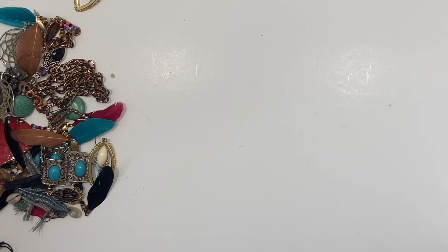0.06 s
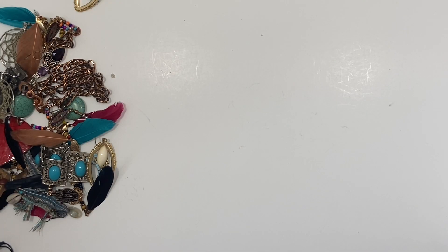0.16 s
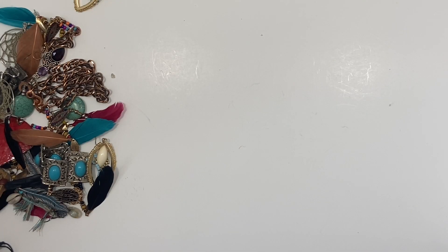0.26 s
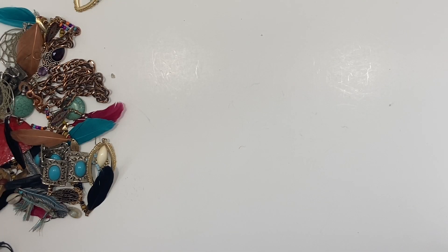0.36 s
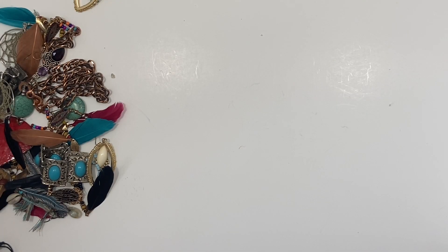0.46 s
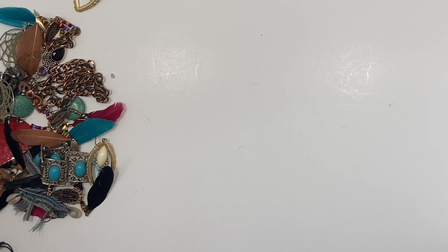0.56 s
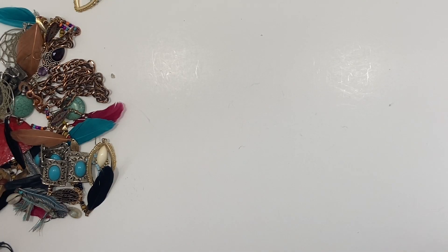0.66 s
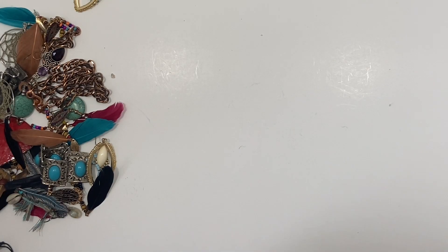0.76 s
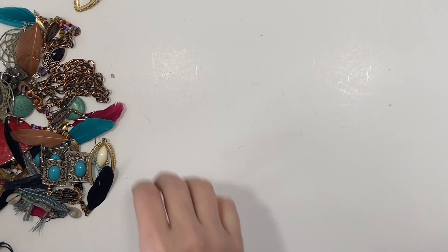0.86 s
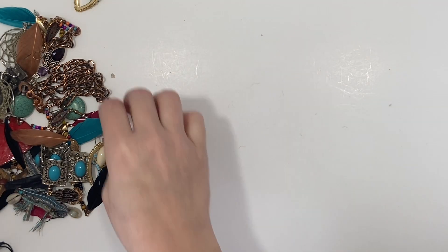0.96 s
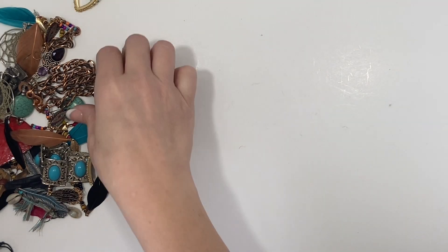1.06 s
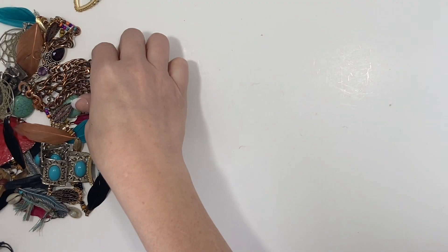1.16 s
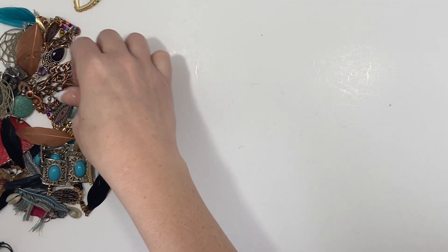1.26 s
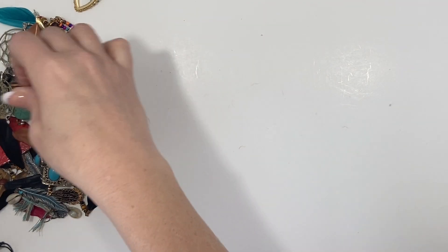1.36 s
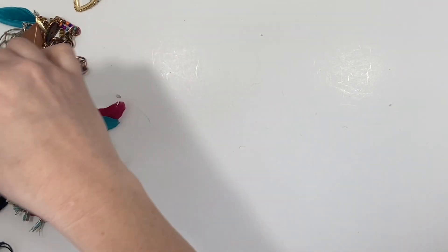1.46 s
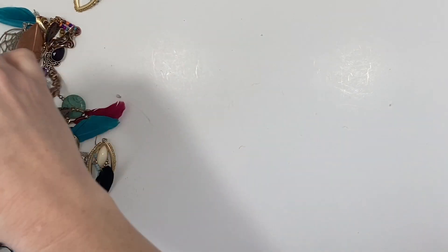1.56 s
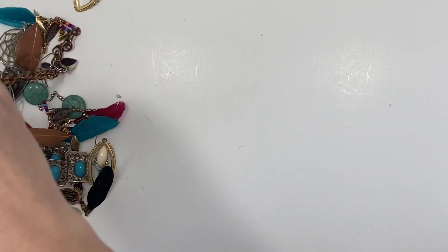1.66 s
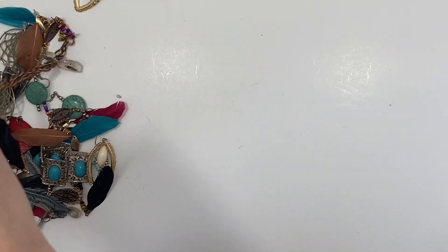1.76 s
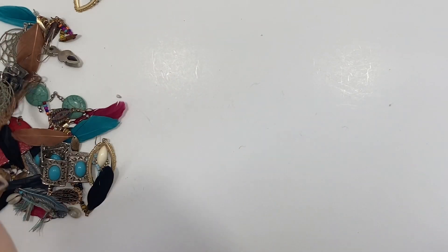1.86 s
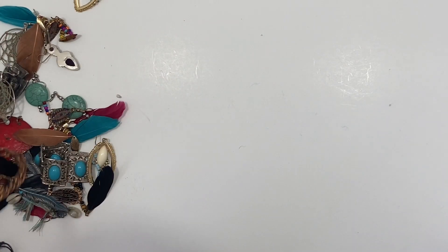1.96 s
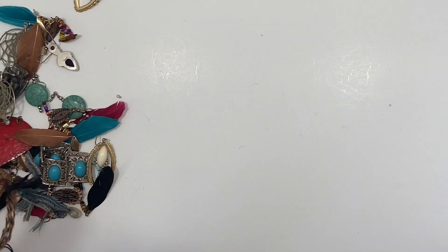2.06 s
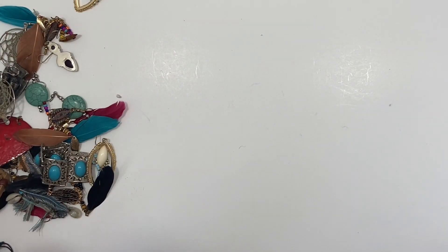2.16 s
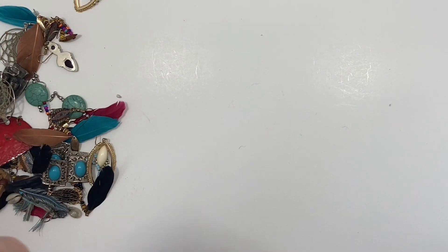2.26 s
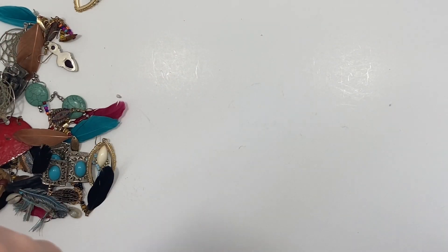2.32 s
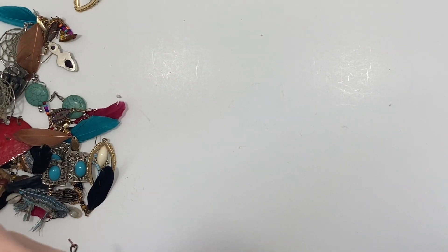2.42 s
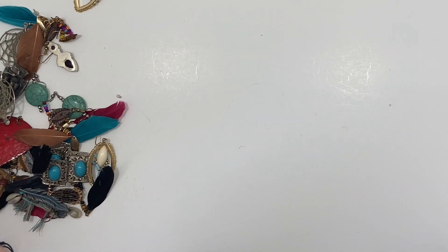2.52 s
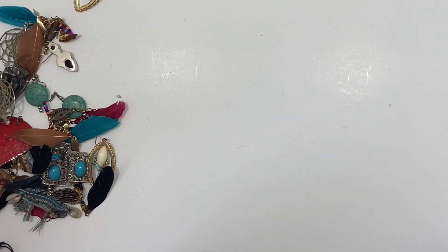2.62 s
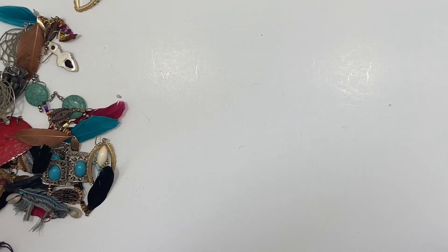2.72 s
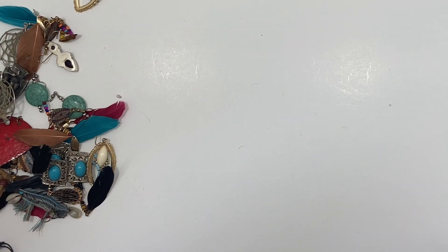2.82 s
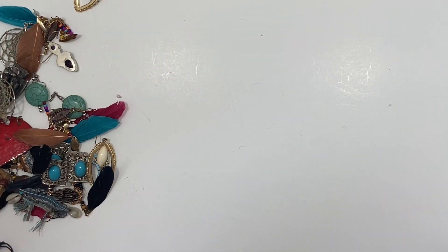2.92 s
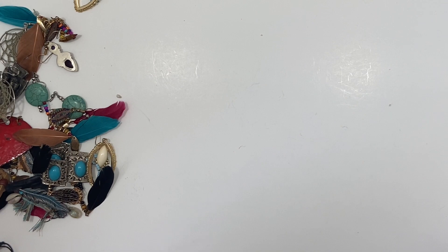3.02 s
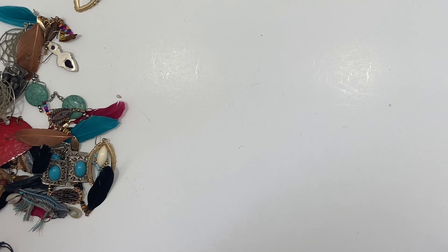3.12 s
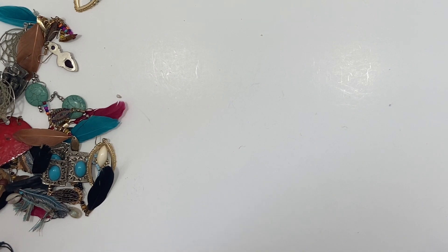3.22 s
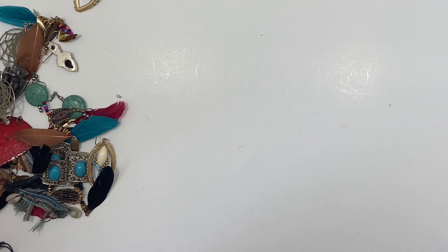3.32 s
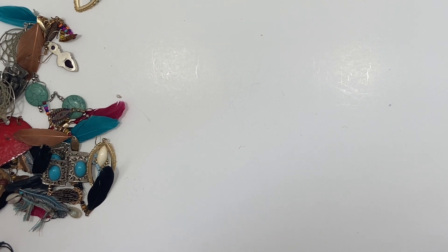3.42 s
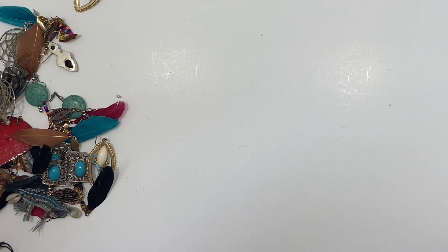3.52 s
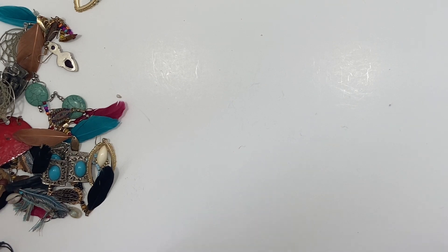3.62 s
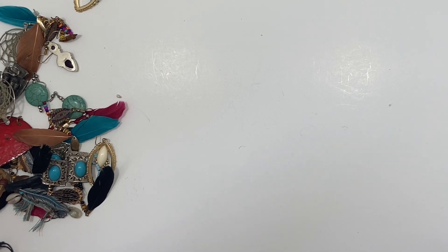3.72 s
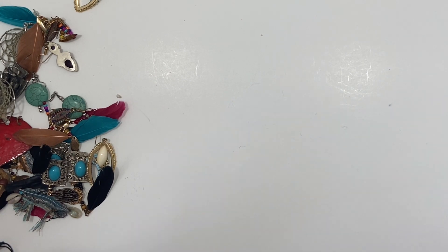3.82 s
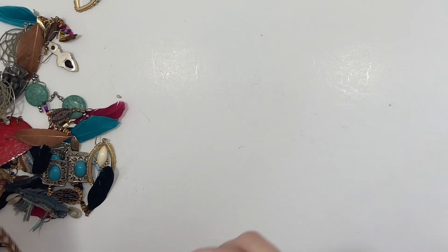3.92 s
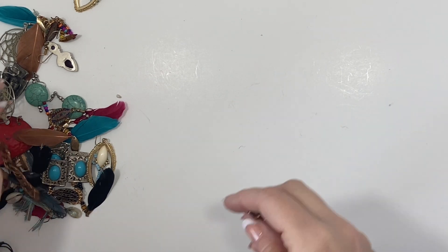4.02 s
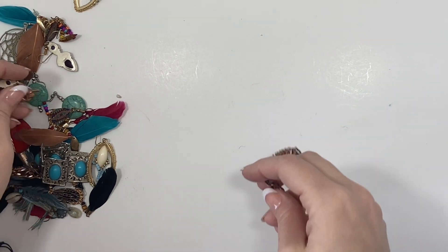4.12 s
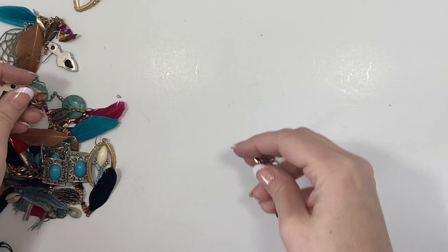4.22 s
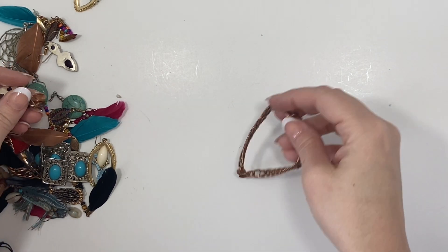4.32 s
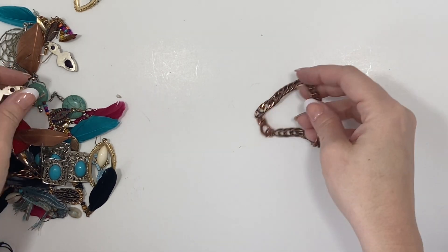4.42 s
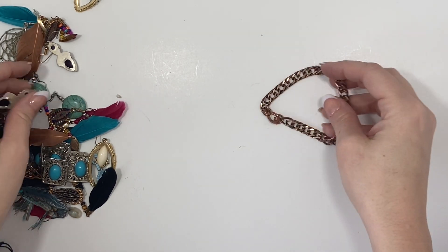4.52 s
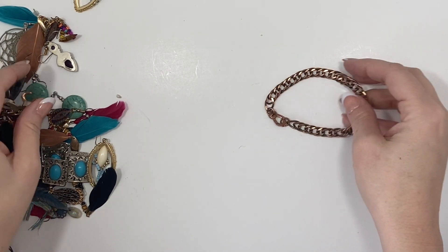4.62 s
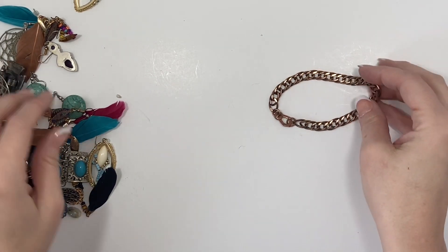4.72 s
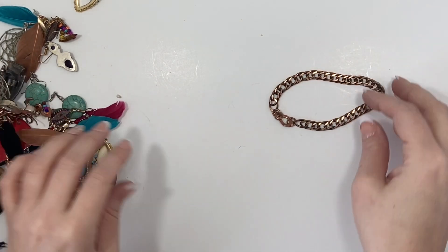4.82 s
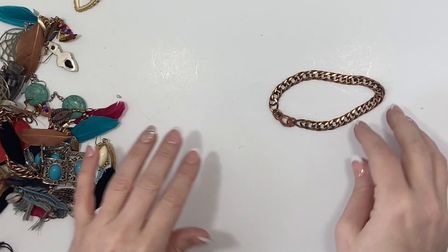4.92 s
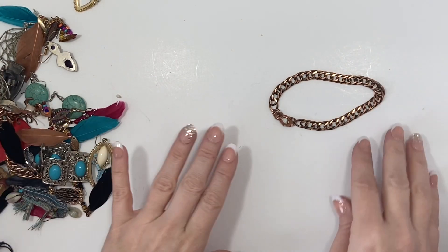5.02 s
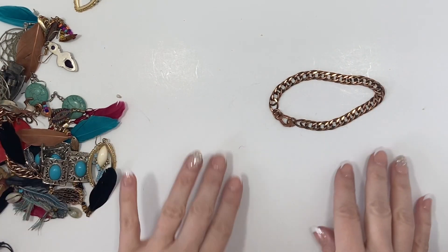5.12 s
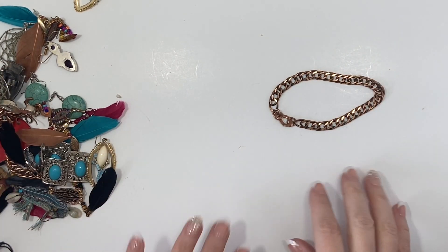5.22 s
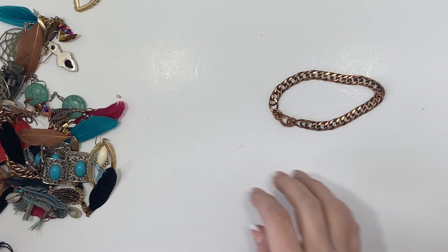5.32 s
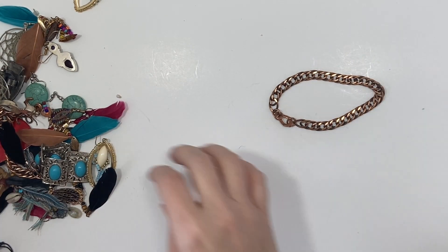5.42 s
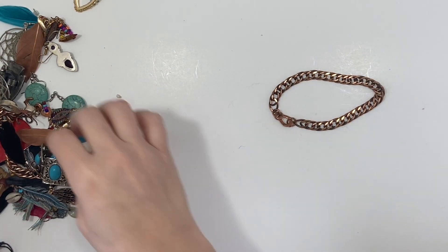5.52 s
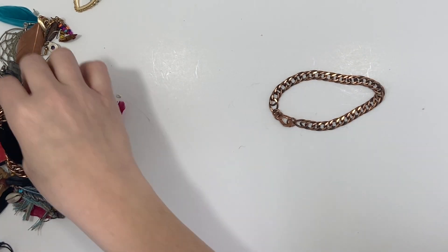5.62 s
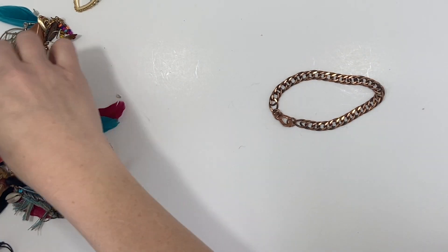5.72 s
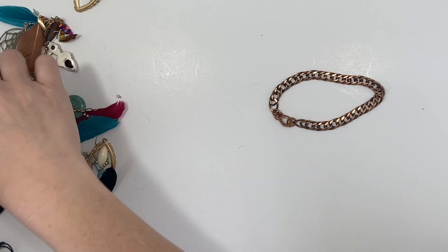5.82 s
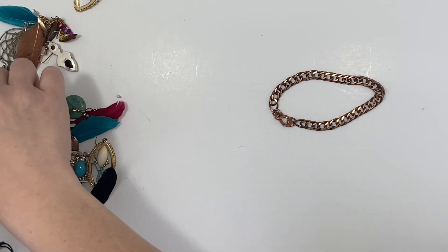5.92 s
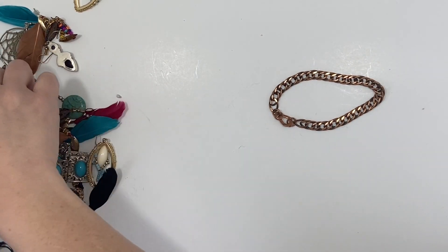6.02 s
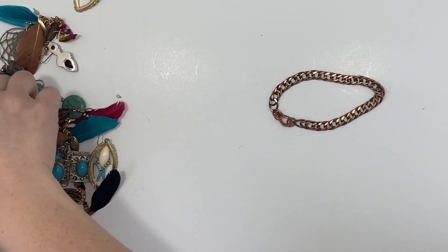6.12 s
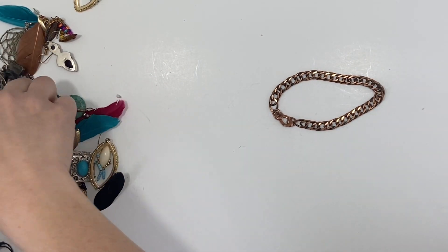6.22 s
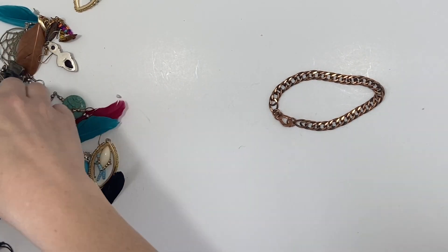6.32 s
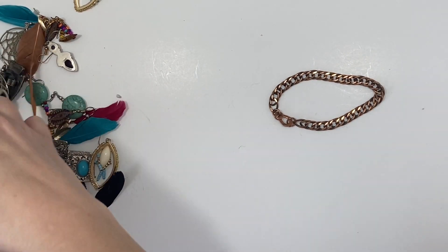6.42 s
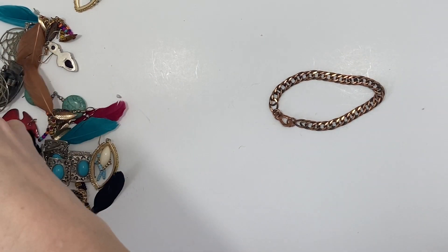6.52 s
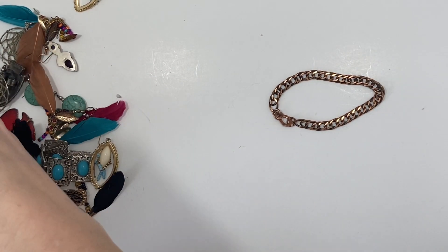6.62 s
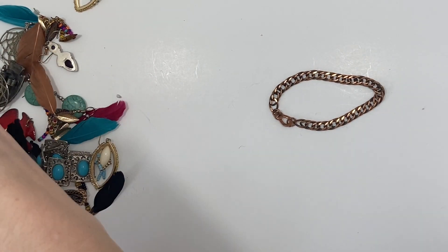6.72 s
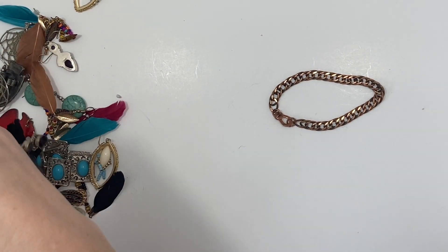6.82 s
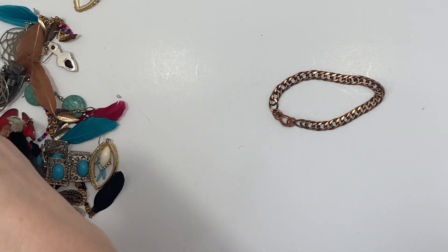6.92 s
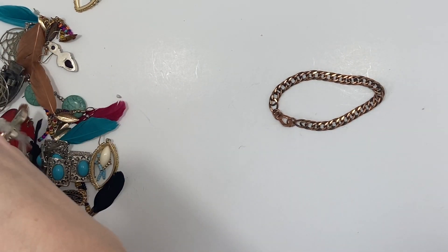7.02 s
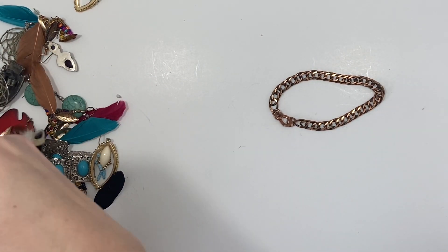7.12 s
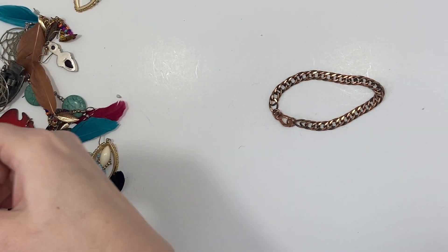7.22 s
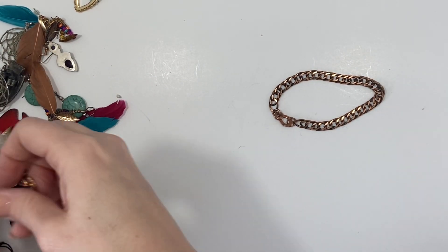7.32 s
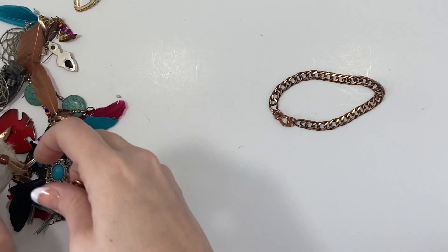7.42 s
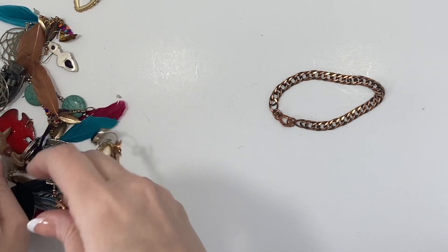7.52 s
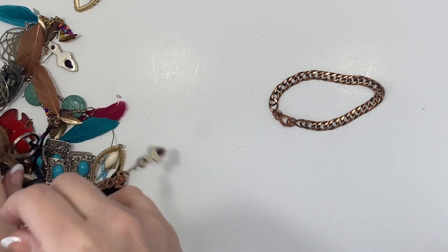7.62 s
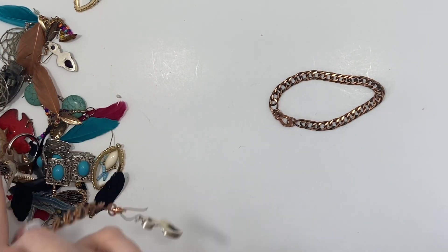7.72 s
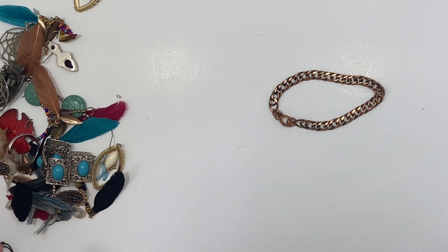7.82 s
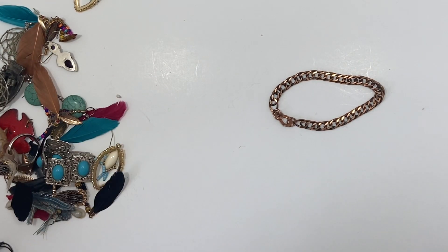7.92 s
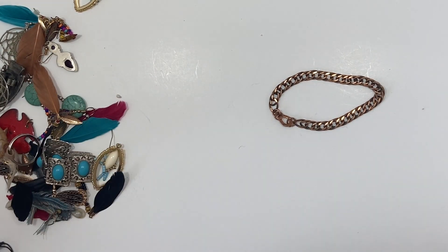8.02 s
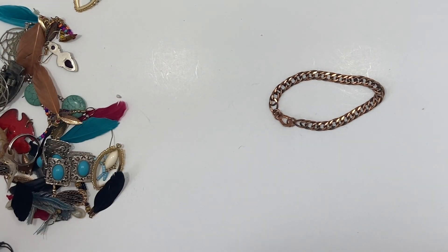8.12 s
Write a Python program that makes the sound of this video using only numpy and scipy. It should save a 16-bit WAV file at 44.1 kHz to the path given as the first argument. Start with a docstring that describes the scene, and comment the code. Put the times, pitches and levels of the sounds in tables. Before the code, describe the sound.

Metal chains jingle and clink as hands rummage through a jewelry heap, with dull tabletop knocks, a link bracelet laid down and a final hard clack.

```python
"""Small quiet room, hard table: hands rummage in a heap of chain jewelry and lay a link bracelet down.
Links tick and jingle (noise cracks plus dying modes, thick where hands move); one metal piece rings (fixed modes).
Fingers and beads knock the tabletop (modes plus dispersed bending waves); sliding rasps (grainy noise).
At last something hard clacks down (crack plus modes). Close two-port microphone, low rumble and hum."""
import sys
import numpy as np
from scipy import signal
from scipy.fft import rfft, irfft
from scipy.io import wavfile

SR = 44100
rng = np.random.default_rng(int(sys.argv[2]) if len(sys.argv) > 2 else 0)


def unload_audio(sound):
    """Save the sound as a 16-bit wav file, at the path given as the first command line argument."""
    columns = np.transpose(np.atleast_2d(sound))
    # keep every value between -1 and 1, then stretch to whole-number steps
    steps = np.round(np.clip(columns, -1, 1) * 32767)
    wavfile.write(sys.argv[1], SR, steps.astype(np.int16))


N = 359900  # samples

# Levels "over 10 ms": energy of the sound equals 10 ms at that rms level.
# room background spectrum, scaled to rms AIR_RMS_DB: (frequency [Hz], relative density [dB per Hz])
AIR_SPECTRUM = [(20, -33), (45, -8), (75, -4), (110, -3.5), (150, -14), (220, -19), (300, -21),
                (480, -25.5), (900, -39), (3000, -44.5), (10000, -52), (16000, -63.5)]
AIR_RMS_DB, HUM_HZ, HUM_RMS_DB = -62, 120.7, -62.5  # hum level before its waver
# moves of the hands that stir the chains: (start [s], length [s], link jingle [dB], its change over the move [dB],
# treble of the finest links re jingle [dB], dragging on the table re jingle [dB])
# In turn: chain let down; fingers land in heap, gather a chain, lift it clear, hold it, turn it; a shake;
# bracelet carried over, laid down, let go; brush against heap; hand lands, rummages; beads pushed along table;
# chain teased out, tugged, pulled free, trails over table, dangles.
HAND_MOVES = [(0.043, 0.32, -53.5, -4.5, -4, 2.5), (1.042, 0.28, -51.5, -14.5, -2.5, -3.5),
              (1.29, 0.54, -52.5, -2, -1.5, -2.5), (1.852, .26, -70, 1, 4.5, -12.5),
              (2.224, 0.44, -89.5, -12, 15, -4.5), (3.13, .76, -79.5, 0, 10.5, -7.5),
              (3.985, 0.051, -42, -3.5, 7.5, -12.5), (4.147, 0.23, -80, 13, 0, -10.5),
              (4.358, 0.28, -46.5, -2.5, -5, -4), (4.672, 0.067, -59.5, 8.5, -14, -3),
              (5.775, 0.027, -67.5, 0, 2.5, -20), (5.923, 0.27, -50.5, -12, -1, -4.5),
              (6.21, 0.46, -51, -3, 1, -7), (6.75, 0.12, -60, 1, 0, 7), (6.945, 0.13, -63, 12.5, -0.5, -9),
              (7.167, 0.21, -62, 3, 0.5, -3), (7.464, 0.073, -45.5, -8, -1, -4),
              (7.614, 0.041, -56.5, -6, 1, 6.5), (7.924, 0.059, -85, -1.5, 23.5, -8.5)]
ONSET_DB_PER_S, SETTLE_DB_PER_S = 2500.5, 260  # links start moving, come to rest
# gentler moves stir fewer links: share = amplitude ratio ** THINNING_EXPONENT
ALL_MOVING_DB, THINNING_EXPONENT = -50, 0.28
SHAKE_DB, SHAKE_DB_PER_S = -13, 301  # links shaken by a larger contact: level re its table level, decay
RATTLE_DB, RATTLE_DB_PER_S = -13, 347.5  # things rattling after a knock: level re the knock, decay
# colour of the links: (frequency [Hz], level [dB])
LINK_COLOUR = [(300, -9), (700, -13), (1500, -9.5), (2100, -3.5), (2800, -4), (4400, 3), (6200, 1.5),
               (8000, -5), (9000, -1), (11000, 3.5), (13000, -7), (15000, 3), (17000, -5)]
# metal contacts that stand out of the jingle: (time [s], body over 10 ms before trim [dB], treble re body [dB])
LINK_CONTACTS = [(0.046, -44.5, 1.5), (0.126, -46.5, 5), (0.24, -51, -11), (0.257, -45, 1.5),
                 (0.29, -29, -9), (0.296, -29, -18), (0.304, -25.5, -27), (0.314, -26.5, -28),
                 (0.532, -72, -13), (1.04, -47.5, -6), (1.078, -46.5, -11), (1.105, -43, -10),
                 (1.116, -41, -10), (1.184, -44, -4), (1.323, -40, 6), (1.388, -47.5, 15.5),
                 (1.458, -36.5, -6), (1.478, -40.5, 1), (1.539, -42.5, 2), (1.554, -37.5, 3),
                 (1.596, -45, -0.5), (1.633, -42.5, -4), (1.688, -43.5, 8.5), (1.746, -48.5, 17.5),
                 (1.793, -39, 10), (1.817, -48.5, 14), (1.87, -60, 16), (1.884, -55, 3), (1.925, -46, -16),
                 (2.02, -57, -1), (2.105, -62, 17), (2.173, -67.5, 12), (2.202, -66.5, 9.5),
                 (2.338, -72.5, 17), (2.67, -73, 19.5), (3.167, -72, 12.5), (3.226, -60, 0.5),
                 (3.327, -67, 4), (3.423, -64, 14), (3.53, -71.5, 0), (3.998, -34.5, 10), (4.013, -45, 5),
                 (4.163, -70, 11.5), (4.238, -64.5, -11), (4.363, -24.5, -18), (4.368, -24.5, -17),
                 (4.373, -26, -22), (4.401, -36, -9.5), (4.417, -39, -12.5), (4.448, -42.5, -6),
                 (4.55, -52.5, 19), (4.572, -39.5, 2), (4.58, -38, -1), (4.591, -40, 6), (4.615, -36, -12),
                 (4.751, -42, -17), (4.765, -44, -6), (4.77, -39, -13), (4.822, -67, 16.5),
                 (5.945, -44.5, 9), (6.192, -47, -2), (6.294, -35, -16), (6.391, -39.5, 4), (6.484, -34, 2),
                 (6.569, -48, 11), (6.594, -48.5, 8), (6.647, -40.5, -10), (6.678, -45, -18),
                 (6.812, -50, 9.5), (6.848, -44.5, 0), (6.956, -57.5, 13.5), (7.096, -37, -8),
                 (7.159, -38.5, 5), (7.282, -44.5, -21), (7.361, -59, 13), (7.39, -60, 10),
                 (7.474, -31.5, -6), (7.514, -32, -6), (7.619, -35, -4), (7.702, -54, -16),
                 (8.08, -29, -10)]
# blows on the tabletop: (time [s], body over 10 ms [dB], hard edge re body [dB], low thump re body [dB])
TABLE_BLOWS = [(0.148, -43, 0, -6.5), (0.261, -42.5, 2.5, -12), (0.301, -41, 10.5, -3.5),
               (1.042, -42, -9, -7.5), (1.11, -48.5, -16, -8), (1.192, -49.5, -6, -3),
               (1.412, -36, -20, -9), (1.461, -38, 0, -5), (1.547, -43.5, -6, 2), (1.75, -44.5, -6, -13.5),
               (1.793, -46, 3, 0.5), (4.374, -33, -7, -9), (4.546, -36.5, -13.5, -2.5),
               (4.572, -45.5, 3.5, -15.5), (4.59, -32, -6.5, 1.5), (4.762, -50, 7.5, -9),
               (5.944, -38, -20, 0.5), (6.001, -39, -7, 6.5), (6.388, -33.5, -12.5, -8.5),
               (6.488, -37, -16, 1.5), (6.513, -33, -20.5, -2.5), (6.649, -51, -2, 7),
               (6.801, -40.5, -14, -9), (6.85, -42.5, 1.5, -8), (7.158, -39, -6, -3),
               (7.281, -38, -13, -4.5), (7.476, -36, -5, -7), (7.533, -47, -15, 5.5),
               (7.639, -25.5, -6, -9.5), (8.087, -27, -9, -2)]
# modes of the tabletop: (frequency [Hz], level before per-blow spread [dB], t60 [s])
TABLE_MODES = [(63.4, -10, 0.25), (89, -6, 0.11), (126, -6, .15), (178.7, -6.5, 0.17), (241, -5, 0.17),
               (274.6, -2.5, 0.082), (315, -5.5, 0.063), (380, -3.5, 0.017), (424, -5.5, 0.053),
               (503, 0.5, 0.016), (697, -1.5, 0.027), (825, -7.5, 0.028), (1070, -7, 0.074),
               (1197, -4, .04), (1604.5, -6.5, 0.013), (1950, -9, 0.025), (2470, -9.5, 0.046)]
# colour of the first bending wave of a knock: (frequency [Hz], level [dB])
KNOCK_COLOUR = [(20, -47), (100, -16.5), (300, -2), (550, 2), (850, -12), (1250, -4.5), (1800, -7),
                (2600, -9), (4500, -25.5), (16000, -61.5)]
# soft rasps of things and hands sliding: (start [s], length [s], level [dB], change over the slide [dB])
SLIDE_STROKES = [(3.648, 0.14, -55.5, -2.5), (5.119, 0.29, -69, -21)]
# light taps of the things that slide: (time [s], level over 10 ms [dB])
SLIDE_TAPS = [(3.617, -47), (3.715, -48), (5.048, -57.5)]
# colour of slides and taps: (frequency [Hz], level [dB])
SLIDE_COLOUR = [(200, -25), (1100, -19.5), (1900, -13), (2900, 1), (3900, -10), (5000, -6), (7500, -15.5),
                (11000, -14.5), (16000, -18.5)]
# blows on the ringing piece: (time [s], modes below SPLIT_HZ over 10 ms [dB], modes above re those [dB])
PIECE_BLOWS = [(3.9937, -36.5, 1), (3.998, -31.5, 9.5), (4.0246, -29, 0.5), (6.237, -43, -6),
               (6.2516, -33, -1.5), (6.3014, -37.5, -1), (6.3127, -40.5, 4), (6.3461, -36, 0.5),
               (6.4949, -26.5, -3.5), (6.4997, -29, 4), (6.511, -27, -4), (6.6093, -43, -2),
               (7.6538, -44, -4.5)]
# modes of the ringing piece: (frequency [Hz], level before per-blow spread [dB], t60 [s])
PIECE_MODES = [(2595, -19, 0.064), (3910, -0.5, 0.057), (5970, 9, 0.044), (8000, -10, .055),
               (8165, 4.5, .075), (10980, -12.5, 0.023), (11830, -7, 0.072), (13700, -5.5, 0.054),
               (14000, 2, 0.053)]
# modes of the hard object put down last: (frequency [Hz], level [dB], t60 [s])
CLACK_MODES = [(770, -10.5, 0.13), (1004, 3, 0.047), (1086, -4, 0.12), (1210, -10.5, 0.061),
               (1750, 9, 0.022), (1910, 9.5, 0.036), (1990, 2, .04), (2730, 5.5, 0.048), (2860, -2, 0.055),
               (3460, -9, 0.023), (4130, -3, 0.041), (4480, -5, 0.0233)]
# colour of its crack: (frequency [Hz], level [dB])
CLACK_COLOUR = [(100, -19.5), (700, -2.5), (1500, -7), (3000, -1), (4300, 1.5), (5600, -11.5), (7500, -13),
                (10000, -14.5), (16000, -28)]
CLACK_S, CLACK_DB = 8.087, -14  # time of landing; crack level over 10 ms
# reverberation: (frequency [Hz], t60 [s])
ROOM_DECAY = [(100, 0.79), (300, 0.21), (1400, 0.18), (4000, 0.13), (9000, 0.039), (16000, .13)]
# phase between the microphone ports: (frequency [Hz], lead of left [rad])
PORT_PHASE = [(0, 0), (650, 0), (1000, .8), (1290, 2), (1720, .6), (2150, .15), (7490, -.1), (8300, -1.3),
              (9050, -3.14), (10900, -5), (11600, -7.3), (13300, -9.42), (14900, -11.3), (16400, -12.7)]
SPLIT_HZ = 8500  # body / treble
BAND_LIMIT_HZ = 16000


def gain_of(db):
    """Decibels to amplitude factor."""
    return 10 ** (np.asarray(db) / 20)


def evened(x):
    """Scales to rms 1."""
    return x / np.sqrt(np.mean(x ** 2) + 1e-20)


def sized(x):
    """Scales a short sound to the energy of 10 ms at rms 1."""
    return x * np.sqrt(SR / 100 / (np.sum(x ** 2) + 1e-20))


def read(points, hz):
    """Interpolates a spectrum table on a log-frequency axis."""
    point_hz, value = np.transpose(points)
    return np.interp(np.log(hz + 1), np.log(point_hz + 1), value)


def add(mix, at_s, sound):
    """Mixes a sound in at at_s, in place."""
    part = mix[max(round(at_s * SR), 0):][:len(sound)]
    part += sound[:len(part)]


def band(x, edges_hz, kind, order=4):
    """Causal Butterworth filter."""
    return signal.sosfilt(signal.butter(order, edges_hz, kind, fs=SR, output="sos"), x)


def noise(points, size):
    """Noise of rms 1 with a given spectrum."""
    spectrum = rfft(rng.standard_normal(size))
    return evened(irfft(spectrum * gain_of(read(points, np.fft.rfftfreq(size, 1 / SR))), size))


def ring(hz, db, t60_s, t, late_s=0):
    """Sum of dying sines of random polarity; each may start a little late."""
    age_s = np.maximum(t[:, None] - late_s, 0)
    modes = gain_of(db - 60 * age_s / t60_s) * np.sin(2 * np.pi * hz * age_s)
    return modes @ rng.choice([-1, 1], len(hz))


def background(side_db=-17, waver=.25):
    """Low rumble of the room, slightly wide, and a mains hum of slowly wavering amplitude."""
    t = np.arange(N) / SR
    sway = evened(band(rng.standard_normal(N), 3, "low", order=2))
    hum = np.sqrt(2) * np.sin(2 * np.pi * HUM_HZ * t) * (1 + waver * sway)
    side = gain_of(side_db) * noise(AIR_SPECTRUM, N)
    air = noise(AIR_SPECTRUM, N) + np.array([side, -side])
    return gain_of(AIR_RMS_DB) * air + gain_of(HUM_RMS_DB) * hum


def stroke(t, start_s, length_s, db, change_db, settle_db_per_s=SETTLE_DB_PER_S):
    """Power of one move at times t: quick start, a hold that swells or sags, settling."""
    held_db = db + change_db * np.clip((t - start_s) / length_s, 0, 1)
    early_s = np.maximum(start_s - t, 0)
    late_s = np.maximum(t - start_s - length_s, 0)
    return gain_of(held_db - ONSET_DB_PER_S * early_s - settle_db_per_s * late_s) ** 2


def aftermath(t, start_s, db, db_per_s):
    """Power at times t of the rattling that a blow leaves behind."""
    return (t > start_s) * gain_of(db - db_per_s * np.maximum(t - start_s, 0)) ** 2


def stirring(t, inherit=.7, fine_db=-1):
    """Amplitudes at times t of links, their treble and dragging: powers of moves and blows add up."""
    body, treble, drag = np.zeros((3, len(t)))
    for start_s, length_s, db, change_db, treble_db, drag_db in HAND_MOVES:
        power = stroke(t, start_s, length_s, db, change_db)
        body += power
        treble += power * gain_of(treble_db) ** 2
        drag += power * gain_of(drag_db) ** 2
    for at_s, db, treble_db in LINK_CONTACTS:
        power = aftermath(t, at_s, db + SHAKE_DB, SHAKE_DB_PER_S)
        body += power
        # shaken links inherit part of the contact's brightness
        treble += power * gain_of(fine_db + inherit * treble_db) ** 2
    for at_s, db, _, _ in TABLE_BLOWS:
        drag += aftermath(t, at_s, db + RATTLE_DB, RATTLE_DB_PER_S)
    return np.sqrt([body, treble, drag])


def contact(crack_s=.0015, chatter_s=0.0053, chatter_db=-13, ring_db=-4, mean_t60_s=0.045, rise_s=0.0017,
            mode_count=14, size=2048):
    """Two links meet: a crack, a brief chatter and the modes of that link. Returns (body, treble)."""
    t, f = np.arange(size) / SR, np.fft.rfftfreq(size, 1 / SR)
    # every link favours its own few broad resonances
    own_hz = np.linspace(0, 17000, 20)
    own_db = 5.5 * rng.standard_normal(len(own_hz))

    def colour_db(hz):
        return read(LINK_COLOUR, hz) + np.interp(hz, own_hz, own_db)

    rasp = evened(irfft(rfft(rng.standard_normal(size)) * gain_of(colour_db(f))))
    crack = rasp * (np.exp(-t / crack_s) + gain_of(chatter_db) * np.exp(-t / chatter_s))
    mode_hz = rng.uniform(2300, 16000, mode_count)
    t60_s = mean_t60_s * (.5 + rng.random(mode_count))
    modes = ring(mode_hz, colour_db(mode_hz), t60_s, t)
    x = (sized(crack) + gain_of(ring_db) * sized(modes)) * (1 - np.exp(-t / rise_s))
    return sized(band(x, SPLIT_HZ, "low")), sized(band(x, SPLIT_HZ, "high"))


def tabletop(spread=0.1322, wave_db=1, dense_db=-7, dense_s=0.021, size=12000):
    """One blow on the board: bending waves bring high notes first, low ones later; modes and dense noise die away."""
    t, f = np.arange(size) / SR, np.fft.rfftfreq(size, 1 / SR)
    hz, db, t60_s = np.transpose(TABLE_MODES)
    # travel time falls as 1 / sqrt(frequency); spread [s * sqrt(Hz)]
    delay_s = spread * np.maximum(np.maximum(f, hz.min()) ** -.5 - hz.max() ** -.5, 0)
    phase = -2 * np.pi * np.cumsum(delay_s + 1e-3) * f[1]
    wave = irfft(gain_of(read(KNOCK_COLOUR, f)) * np.exp(1j * phase), size)
    spot_db = 2 * rng.standard_normal(len(hz))  # the spot that is hit weights the modes
    modes = ring(hz, db + spot_db, t60_s, t, np.interp(hz, f, delay_s))
    dense = noise(KNOCK_COLOUR, size) * np.exp(-t / dense_s)
    blow = sized(modes) + gain_of(wave_db) * sized(wave) + gain_of(dense_db) * sized(dense)
    return blow * (1 - t / t[-1])


def jingle(full_rate_per_s=400, link_count=40, candidates=16000):
    """Many small contacts of uneven size follow the stirring, fewer when gentle; each also taps the table."""
    links = []
    for _ in range(link_count):
        tap = sized(band(tabletop(size=3000), [200, 1400], "band", order=2))
        links.append((*contact(), tap))
    when_s, chance, strength, which = rng.random((4, candidates))
    when_s = when_s * N / SR
    size = gain_of(4.2 * np.minimum(-np.log(1 - strength), 3))
    size = size / np.sqrt(np.mean(size ** 2) * full_rate_per_s / 100)
    levels = stirring(when_s)  # body, treble, drag
    moving = np.clip((levels[0] / gain_of(ALL_MOVING_DB)) ** THINNING_EXPONENT, .1, 1)
    # fewer contacts are each stronger, so power follows the stirring
    gains = [size * level / np.sqrt(moving) for level in levels]
    out = np.zeros(N)
    happens = chance < moving * full_rate_per_s * N / SR / candidates
    for k in np.flatnonzero(happens):
        for gain, part in zip(gains, links[int(which[k] * link_count)]):
            add(out, when_s[k], gain[k] * part)
    return out


def clicks(trim_db=-2.3, lead_db=-12, later_db=-11):
    """Larger contacts: each is a small cluster, a faint tick, the main click, then a faint later tick."""
    out = np.zeros(N)
    for hit_s, db, treble_db in LINK_CONTACTS:
        before_s, after_s = rng.uniform(.0015, .006), rng.uniform(.003, .011)
        for at_s, part_db in ((hit_s - before_s, lead_db), (hit_s, 0), (hit_s + after_s, later_db)):
            body, treble = contact(crack_s=0.0011, chatter_s=0.0032, chatter_db=-15.5, ring_db=-5,
                                   mean_t60_s=0.019)
            add(out, at_s, gain_of(db + trim_db + part_db) * (body + gain_of(treble_db) * treble))
    return out


def knocks():
    """Hard things wake the high modes of the table, the weight of a hand its lowest."""
    out = np.zeros(N)
    for at_s, db, edge_db, thump_db in TABLE_BLOWS:
        blow = tabletop()
        body = sized(band(blow, [190, 1000], "band", order=2))
        edge = gain_of(edge_db) * sized(band(blow, 860, "high", order=3))
        thump = gain_of(thump_db) * sized(band(blow, [65, 190], "band", order=3))
        add(out, at_s, gain_of(db) * (body + edge + thump))
    return out


def slide(grain_db=3, tap_decay_s=0.0024, tap_size=2048):
    """Things touch down with a light tap; friction catches and lets go many times a second."""
    t = np.arange(N) / SR
    grain = evened(band(rng.standard_normal(N), 150, "low", order=2))
    level = np.sqrt(sum(stroke(t, *row, settle_db_per_s=900) for row in SLIDE_STROKES))
    out = level * evened(noise(SLIDE_COLOUR, N) * gain_of(grain_db * grain))
    for at_s, db in SLIDE_TAPS:
        tap = noise(SLIDE_COLOUR, tap_size) * np.exp(-t[:tap_size] / tap_decay_s)
        add(out, at_s, gain_of(db) * sized(tap))
    return out


def ringing_piece(crack_db=-8, size=6000):
    """The same few modes at every blow, in a mix that depends on where the piece is hit."""
    out, t = np.zeros(N), np.arange(size) / SR
    hz, mode_db, t60_s = np.transpose(PIECE_MODES)
    halves = (hz < SPLIT_HZ, hz >= SPLIT_HZ)
    for at_s, db, treble_db in PIECE_BLOWS:
        struck_db = mode_db + 2 * rng.standard_normal(len(hz))
        for half, crack, half_db in zip(halves, contact(size=size), (db, db + treble_db)):
            tone = sized(ring(hz[half], struck_db[half], t60_s[half], t))
            add(out, at_s, gain_of(half_db) * (tone + gain_of(crack_db) * crack))
    return out


def clack(ring_db=-1, crack_decay_s=0.0035, size=8000):
    """A hard object meets the table: a dense crack and its own short ring."""
    out, t = np.zeros(N), np.arange(size) / SR
    crack = sized(noise(CLACK_COLOUR, size) * np.exp(-t / crack_decay_s))
    late_s = rng.uniform(0, .0015, len(CLACK_MODES))
    tone = sized(ring(*np.transpose(CLACK_MODES), t, late_s))
    add(out, CLACK_S, gain_of(CLACK_DB) * (gain_of(ring_db) * tone + crack))
    return out


def room(x, first_s=0.0025, early_decay_s=.009, early_db=-13, tail_db=-12, size=20000):
    """Quick reflections from the table and things near by, then a tail whose t60 depends on frequency."""
    t = np.arange(size) / SR
    hz, age_s, z = signal.stft(rng.standard_normal(size), SR, nperseg=256)
    decay = gain_of(-60 * age_s / read(ROOM_DECAY, hz)[:, None])
    tail = signal.istft(z * decay, SR, nperseg=256)[1][:size] * (t > first_s)
    sparse = rng.standard_normal(size) * (rng.random(size) < .06)
    early = sparse * np.exp(-t / early_decay_s) * (t > first_s / 2)
    echo = gain_of(tail_db) * tail / np.linalg.norm(tail) + gain_of(early_db) * early / np.linalg.norm(early)
    return signal.oaconvolve(x, echo)[:N]


def scene(width_db=-2, wide_hz=1500, bright_width_db=-9):
    """All sources are central, on the table ahead; reverberation is widest below wide_hz."""
    direct = jingle() + clicks() + ringing_piece() + knocks() + clack() + slide()
    across = room(direct)
    low_side = gain_of(width_db) * band(across, wide_hz, "low", order=1)
    high_side = gain_of(bright_width_db) * band(across, wide_hz, "high", order=1)
    side = low_side + high_side
    return direct + room(direct) + np.array([side, -side]) + background()


def record(dry, size=400000, ceiling=1.1):
    """The two ports drift apart in phase in the treble; tanh rounds off peaks; then the band limit."""
    phase_rad = np.interp(np.fft.rfftfreq(size, 1 / SR), *np.transpose(PORT_PHASE))
    turn = np.exp(.5j * np.array([phase_rad, -phase_rad]))
    ports = irfft(rfft(dry, size) * turn, size)[:, :N]
    rounded = ceiling * np.tanh(ports / ceiling)
    lowpass = signal.firwin(255, BAND_LIMIT_HZ, window=("kaiser", 9), fs=SR)
    return signal.oaconvolve(rounded, lowpass[None], "same")


dry = scene()
out = record(dry)
unload_audio(out)
```